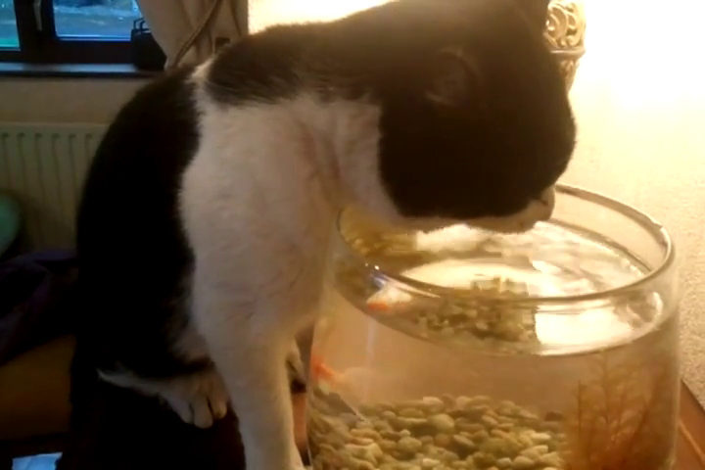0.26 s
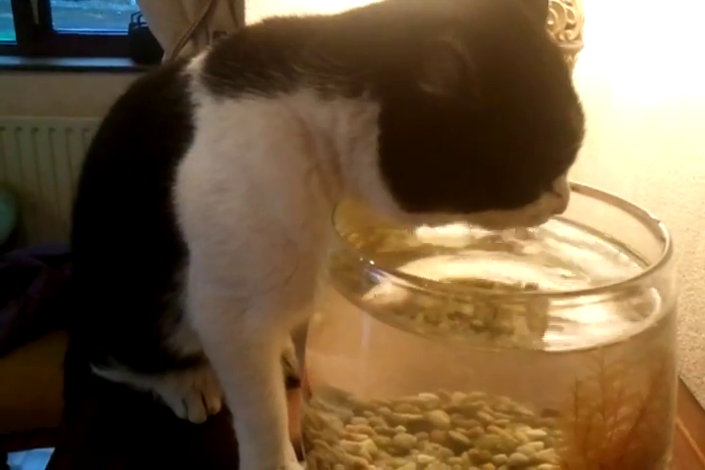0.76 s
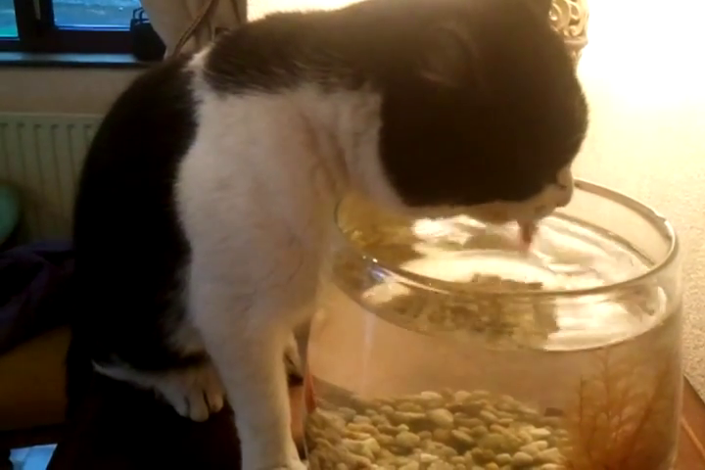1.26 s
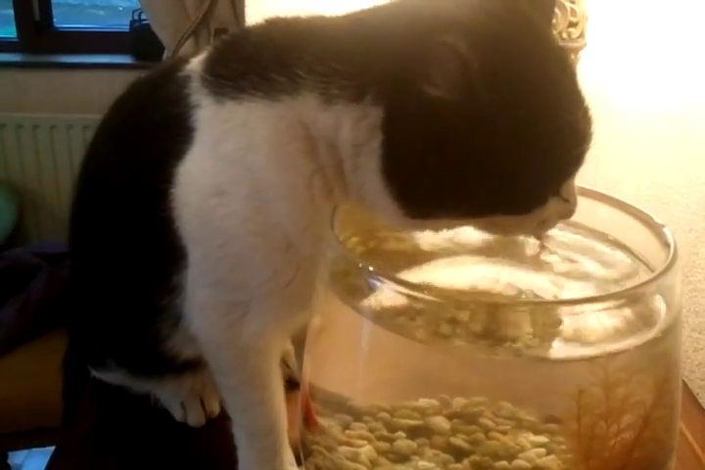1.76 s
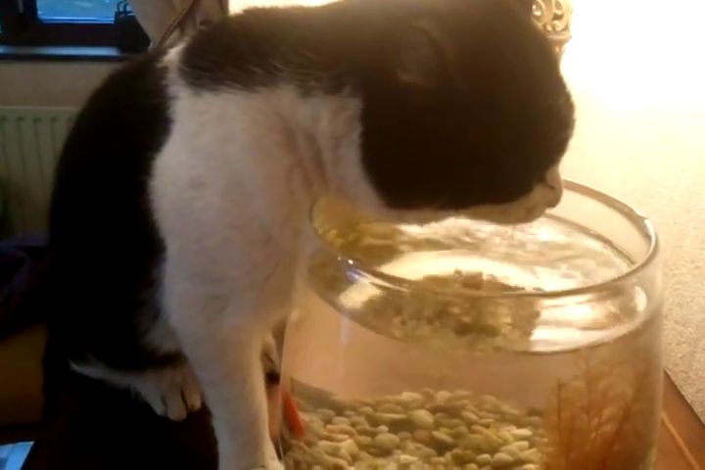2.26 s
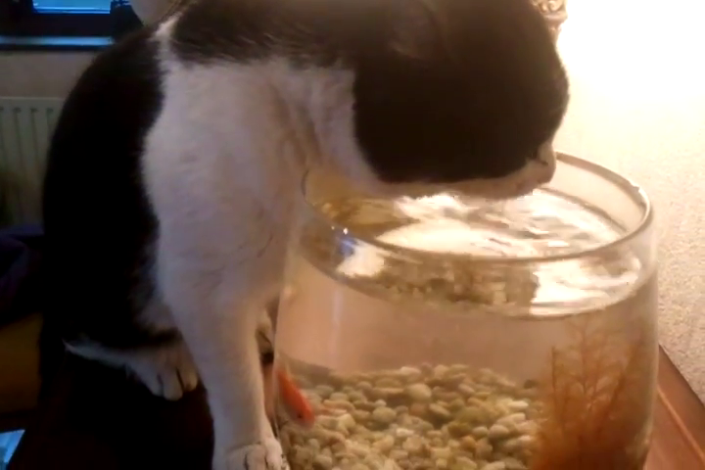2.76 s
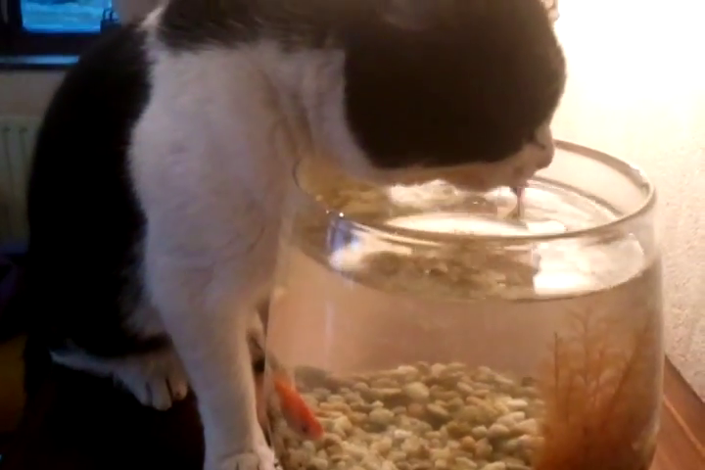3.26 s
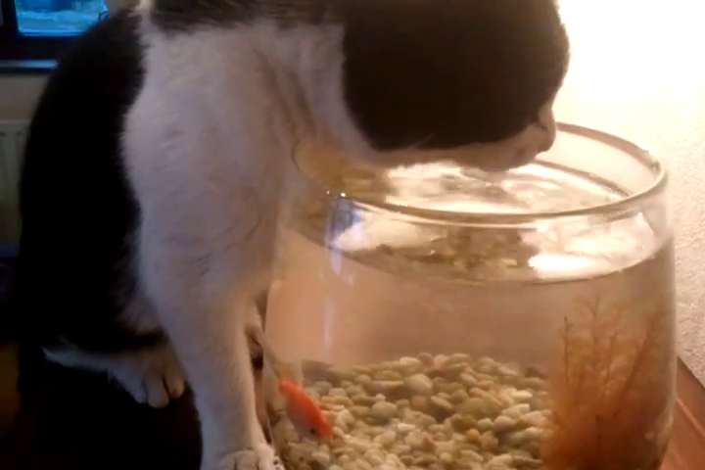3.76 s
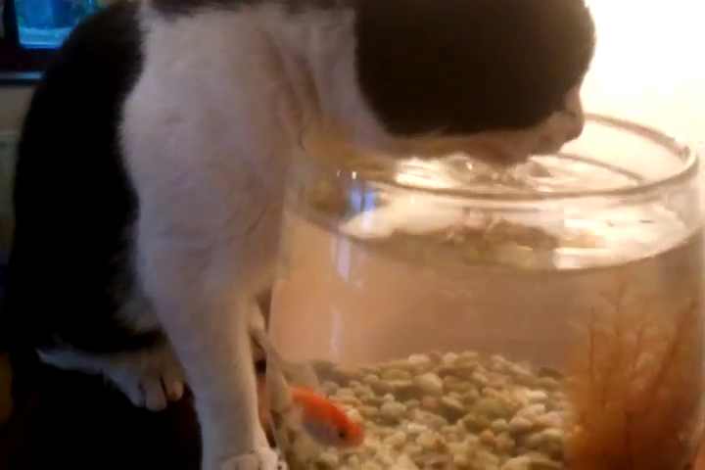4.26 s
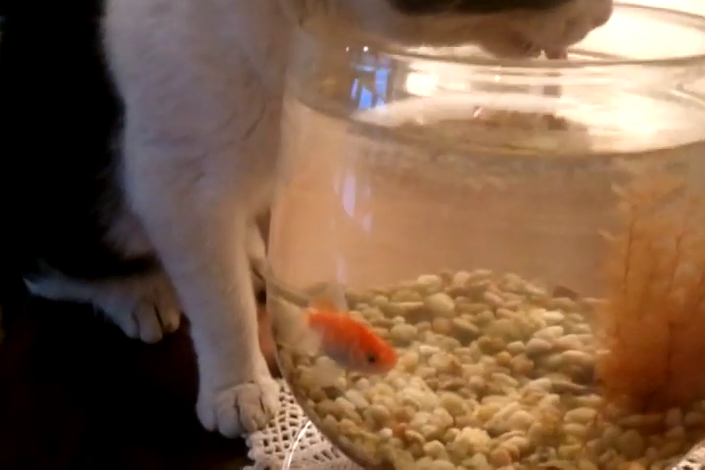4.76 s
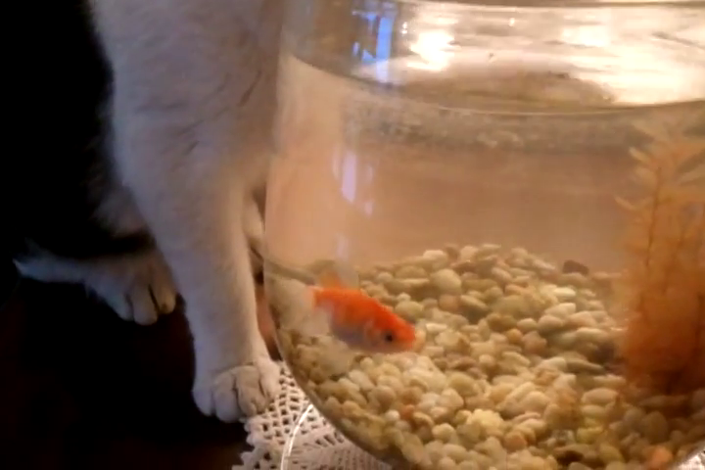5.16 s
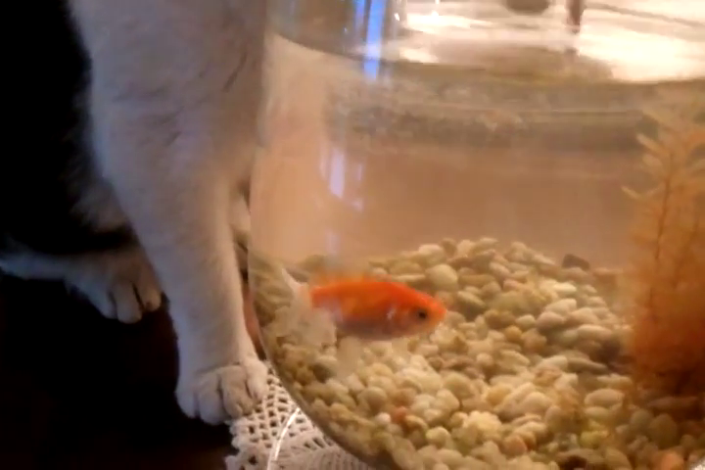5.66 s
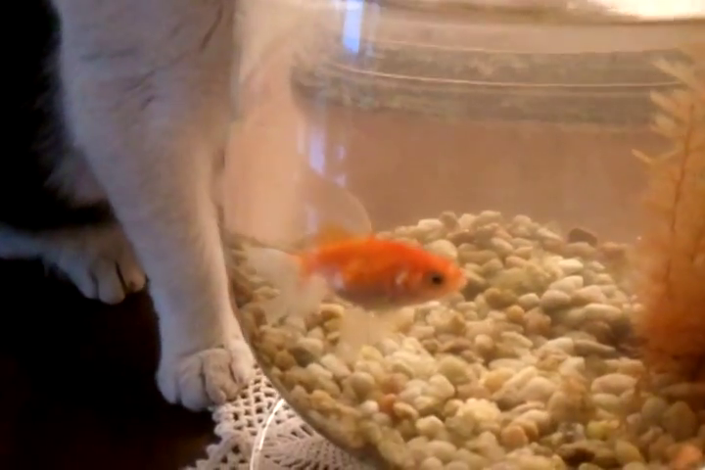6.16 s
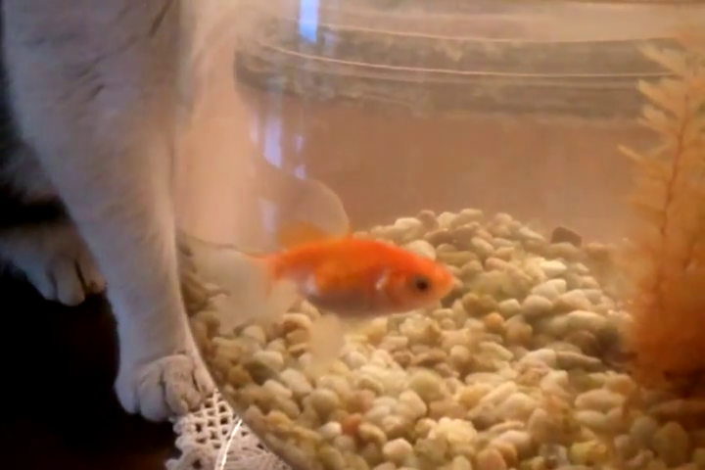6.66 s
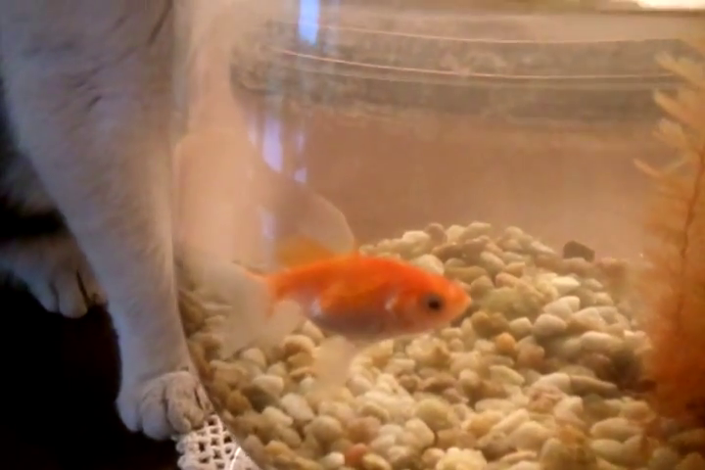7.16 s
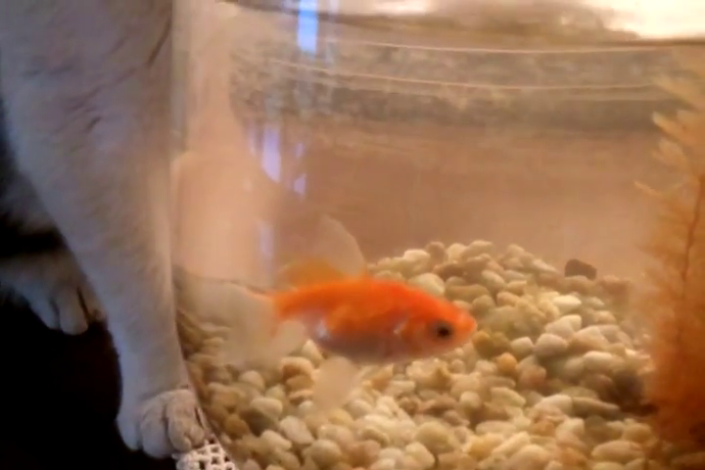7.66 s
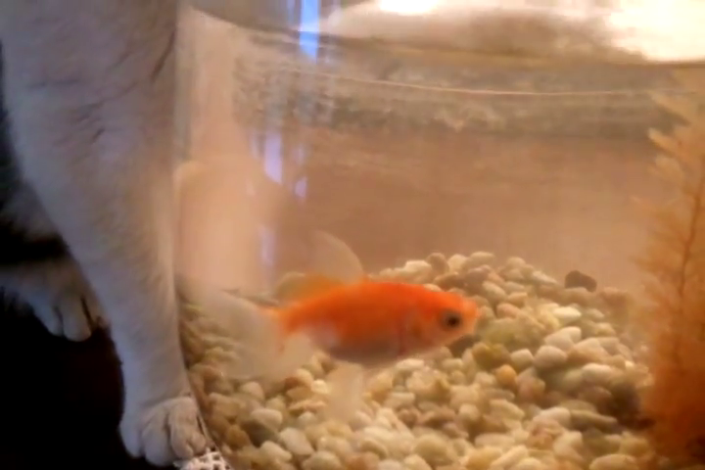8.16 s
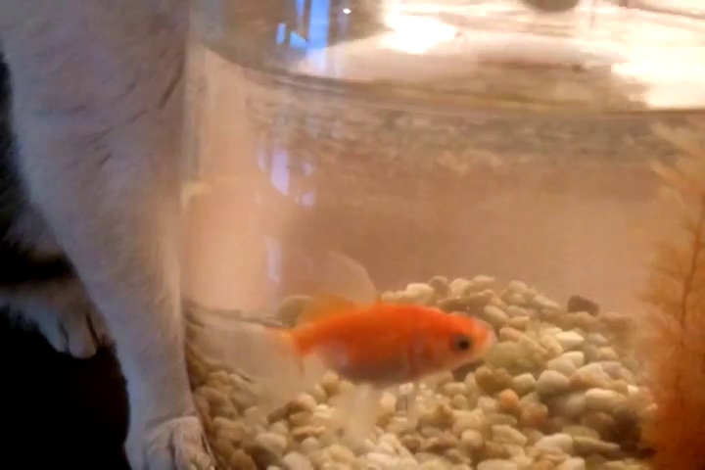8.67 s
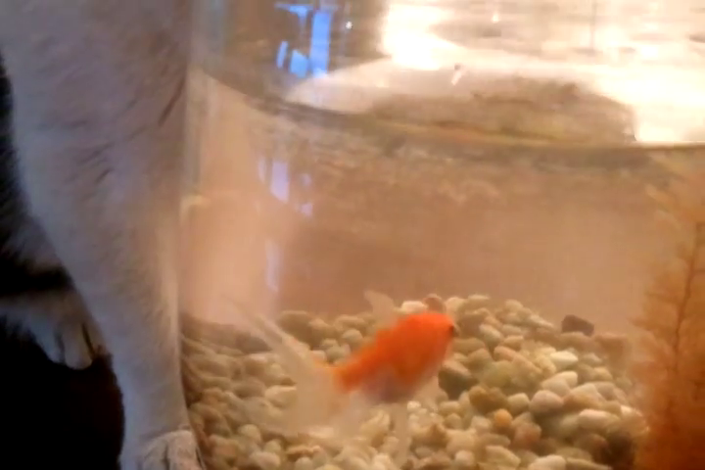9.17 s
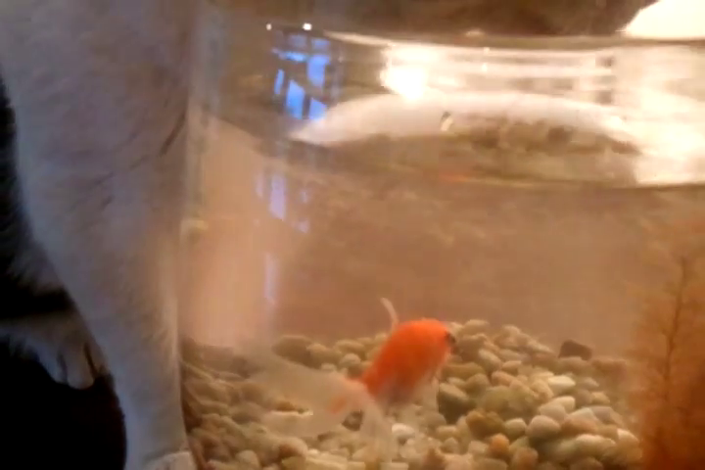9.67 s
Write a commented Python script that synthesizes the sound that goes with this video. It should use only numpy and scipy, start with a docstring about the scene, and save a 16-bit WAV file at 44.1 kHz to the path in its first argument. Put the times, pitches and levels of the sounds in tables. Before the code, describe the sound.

After a faint bump and rustle, a cat drinks steadily from a bowl of water, heard close up in a quiet room. Each lap is a little plop followed by tiny mouth smacks and wet ticks, with the odd drip falling back. Near the end a hard click and a louder, briefly ringing clack, like a latch closing, stand out over the continuing lapping.

```python
"""A faint bump and rustle, then a cat laps water from a glass bowl, about 3.5 times a second.
Each lap is a hollow plop, the damped resonance of an air cavity opened by the tongue; smacks and
wet ticks follow as the mouth closes, and drips fall from the chin. Soft bumps sound nearby in the
quiet room. Late on, something hard, perhaps a latch, clicks and then clacks shut, its modes ringing."""
import sys
import numpy as np
from scipy import signal
from scipy.fft import rfft, irfft, next_fast_len
from scipy.io import wavfile

SR = 44100
rng = np.random.default_rng(int(sys.argv[2]) if len(sys.argv) > 2 else 0)


def generate_wav(sig):
    """Save sig (samples, or channels by samples) to the path in sys.argv[1] as 16-bit PCM at SR."""
    pcm = np.round(np.clip(np.atleast_2d(sig).T, -1, 1) * 32767).astype(np.int16)
    wavfile.write(sys.argv[1], SR, pcm)


N = 437913

# The tongue pulls free of the water.
# Each row: time in seconds, level in dB, cavity pitch in Hz, relative splash level in dB.
LAPS = [(0.329, -44.5, 870, 5), (0.610, -43, 1310, 5.5), (0.872, -36.5, 1160, 2),
        (1.124, -33.5, 1090, -5.5), (1.452, -42.5, 1040, 0.5), (1.711, -44, 1170, 6), (1.962, -33, 940, -9),
        (2.286, -46, 1140, 3.5), (2.564, -41, 940, -1), (2.832, -39.5, 940, 0.5), (3.171, -50, 810, 12.5),
        (3.452, -38.5, 1080, -5), (3.731, -43, 940, 5), (4.072, -54, 1110, -11), (4.368, -41, 1120, -12),
        (4.641, -34, 1130, -17), (4.977, -38, 1070, -15), (5.262, -36.5, 1140, -7), (5.527, -32, 1070, -22),
        (5.884, -36, 1030, -9), (6.173, -37.5, 1070, -4), (6.449, -31.5, 1084, -9), (6.807, -42, 1070, -7),
        (7.115, -45.5, 1020, -17), (7.405, -38.5, 1060, -21), (7.701, -40, 1000, -3),
        (8.061, -33, 1130, -11), (8.350, -35, 980, -11), (8.624, -35, 1015, -6.5),
        (8.893, -31.5, 1010, -8.5), (9.241, -35, 1010, -9), (9.535, -34.5, 1040, -16),
        (9.818, -32, 1130, -10.5)]


def laps():
    """Cavity resonance: the tongue opens a pocket of air that plops, with a splash and a soft squelch."""
    out, t = np.zeros(N), np.arange(-SR // 25, SR // 12) / SR
    for s, db, hz, splash_db in LAPS:
        # the cavity sounds weakly as it opens, however hard it then breaks
        lead_s = .009 * rng.uniform(0.692, 1)
        opening = amp(-45.5) * pop(t + lead_s, hz, cycles=2.3, rise=0.013)
        plop = amp(0.5) * pop(t, hz, cycles=1.57, rise=0.013)
        slosh = spray(t - .003, centre_hz=1110, spread=.2, scatter_s=0.0071, cycles=2.0, count=5)
        splash = spray(t - .001, centre_hz=2720, spread=0.27, scatter_s=0.0041, cycles=1.64, count=8)
        lap = opening + amp(db) * (plop + amp(-12) * slosh + amp(splash_db + 2.5) * splash)
        add(out, s + t[0], lap)
        add(out, s + t[0], amp(-16) * room(lap, build_s=0.0022))
        add(out, s + t[0], amp(-29.5 + 0.66 * db) * squelch(t, lead_s=0.0022, linger_s=0.028, count=140))
    return out


def squelch(t, lead_s, linger_s, count):
    """Shot noise: water creeps over the tongue before a lap and crackles off it afterwards."""
    # The crackle's spectrum. Each row: frequency in Hz, gain in dB.
    wet_spectrum = [(300, -31), (700, -6), (1050, 10.5), (1600, 5), (2600, 0), (4300, -7.5), (6000, -1.5),
                    (9000, -26.5)]
    grains = np.zeros(len(t))
    grains[rng.integers(0, len(t), count)] = rng.standard_normal(count)
    crackle = unit(filtered(grains, lambda hz: amp(along(wet_spectrum, hz))))
    return crackle * np.exp(np.minimum(t / lead_s, -t / linger_s))


def tongue():
    """Bubble resonance: the tongue crackles sliding out; the torn water column fizzes and falls back."""
    out, t = np.zeros(N), np.arange(SR // 16) / SR
    reach_lead_s = .087
    for s, *_ in LAPS:
        reach = spray(t, centre_hz=3600, spread=.42, scatter_s=0.0052, cycles=3.2, count=14)
        add(out, s - reach_lead_s, amp(-46.5) * reach)
    for s, db in each_lap(delay_s=0.015, db=-49):
        fizz = spray(t, centre_hz=5240, spread=0.27, scatter_s=0.0041, cycles=1.2, count=10)
        add(out, s, amp(db) * fizz)
    for s, db in each_lap(delay_s=.019, db=-50.5):
        fall = spray(t, centre_hz=1440, spread=0.26, scatter_s=.008, cycles=1.56, count=5)
        add(out, s, amp(db) * fall)
    return out


def smacks():
    """A smaller cavity resonates higher: the closing mouth rings about an octave above the plop, and a few
    bright bursts ring out with the splash of a lap itself."""
    # The louder smacks, together with a few bright bursts of splash that land right on a lap (at 0.619, 1.723
    # and 2.576 s). Each row: start in seconds, level in dB, cavity pitch in Hz.
    loud = [(0.4237, -40, 2030), (0.4353, -42, 2050), (0.6188, -37, 3650), (0.7, -46, 2220),
            (1.1909, -46, 2990), (1.2423, -33, 2040), (1.2855, -46, 2490), (1.562, -44.5, 2340),
            (1.723, -47, 2880), (1.814, -43.5, 2090), (1.8284, -42.5, 3390), (2.0743, -31.5, 2030),
            (2.576, -41, 2650), (2.6614, -45, 2170), (2.747, -45.5, 2320), (2.7915, -43.5, 1780),
            (2.9504, -28.5, 2060), (3.5588, -46, 2040), (3.5716, -39.5, 2220), (3.8085, -46.5, 3000),
            (4.2064, -40, 2090), (4.4554, -43, 2040), (4.486, -41.5, 2080), (4.755, -35, 2050),
            (5.3786, -46, 2330), (6.1992, -38.5, 2180), (6.5872, -39, 2130), (7.151, -45, 2000),
            (7.5335, -42.5, 2360), (7.879, -41, 2280), (8.2095, -44.5, 2350), (9.3841, -41.5, 2800),
            (9.645, -42.5, 2180), (9.9046, -36, 2140)]
    out, t = np.zeros(N), np.arange(SR // 20) / SR
    loud_s = np.array(loud)[:, 0]
    # a faint smack follows each lap unless a loud one takes its place
    faint = [(s, db, 2220 * np.exp(0.1 * rng.standard_normal()))
             for s, db in each_lap(delay_s=.114, db=-52.5) if np.abs(loud_s - s).min() > .035]
    for s, db, hz in loud + faint:
        note = amp(db) * pop(t, hz, cycles=4.5, rise=0)
        lips = spray(t, centre_hz=2660, spread=0.28, scatter_s=0.0034, cycles=1.46, count=6)
        splash = spray(t, centre_hz=5620, spread=0.22, scatter_s=0.0059, cycles=1.34, count=6)
        smack = note + amp(db / 2) * (amp(-20.5) * lips + amp(-26.5) * splash)
        add(out, s, smack)
        add(out, s, amp(-14) * room(smack, build_s=.002))
    return out


def ticks():
    """Film rupture: saliva snaps with a high tick and a short fizz."""
    # The louder snaps. Each row: start in seconds, level in dB.
    snaps = [(0.5043, -40.5), (0.5508, -33.5), (0.621, -40.5), (0.82, -36), (1.3632, -43), (1.3982, -39),
             (1.5095, -36.5), (1.87, -45), (2.29, -38.5), (2.486, -47), (2.576, -44), (2.8452, -38.5),
             (3.175, -30), (3.237, -39.5), (4.2066, -47), (4.47, -44), (4.554, -46.5), (4.7367, -40.5),
             (4.741, -35.5), (5.8993, -44), (6.471, -44), (6.4832, -41), (7.709, -37), (9.152, -47.5),
             (9.2474, -41), (9.3123, -42), (9.555, -41.5), (9.828, -42)]
    out, t = np.zeros(N), np.arange(SR // 20) / SR
    for s, db in snaps:
        hz = 5750 * np.exp(0.054 * rng.standard_normal())
        note = amp(1.5) * pop(t, hz, cycles=4.5, rise=0.02)
        rupture = amp(-13) * rng.standard_normal(len(t)) * fade(t, 0.01)
        rupture = np.diff(rupture, prepend=0)  # a tiny source radiates mostly treble
        fizz = amp(-9.5) * spray(t, centre_hz=5880, spread=0.3, scatter_s=0.0055, cycles=4.3, count=8)
        tick = amp(db) * (note + rupture + fizz)
        add(out, s, tick)
        add(out, s, amp(-14) * room(tick, build_s=0.0018))
    return out


def drips():
    """Drop impact: a drip opens a small resonant hollow in the surface and throws a little spray."""
    # Drips from the chin into the bowl. Each row: start in seconds, level in dB.
    impacts = [(1.201, -41), (5.546, -41), (5.623, -40), (6.198, -35), (6.533, -37), (6.886, -42.5),
               (8.658, -35.5), (8.971, -41.5), (9.312, -43)]
    out, t = np.zeros(N), np.arange(SR // 20) / SR
    for s, db in impacts:
        hollow_hz = 1075 * np.exp(.06 * rng.standard_normal())
        note = pop(t, hollow_hz, cycles=1.4, rise=.013)
        splash = amp(-7.5) * spray(t, centre_hz=2800, spread=0.27, scatter_s=.004, cycles=1.9, count=5)
        drip = amp(db) * (note + splash)
        add(out, s, drip)
        add(out, s, amp(-19) * room(drip, build_s=.002))
    return out


def droplets(count=130):
    """A random point process: faint wet ticks of the mouth fall independently of the laps."""
    out, t = np.zeros(N), np.arange(SR // 25) / SR
    for when, size, pitch in rng.random((count, 3)):
        drop = spray(t, centre_hz=2300 * 2.7 ** pitch, spread=0.17, scatter_s=0.0067, cycles=3, count=6)
        add(out, when * N / SR, amp(-48.5 + 2 * size) * drop)
    return out


def latch():
    """Modal ringing: each of a quick run of hard contacts cracks and excites the latch's resonances."""
    # Each row: start in seconds, level in dB, relative levels of heavy body and light pawl in dB.
    contacts = [(7.440, -22, 6, -12), (7.4592, -10, -17, 11.5), (7.468, -10, -14, -19), (7.98, -5, 12, 2),
                (7.9827, 1, 5, -14), (7.987, -0.5, 1.5, -14), (7.992, -3, 5, 9.5), (7.9957, -8, -9, 4),
                (8.0012, -14.5, -10, -8)]
    # Each row: frequency in Hz, level in dB, time to fall 60 dB in seconds.
    modes = [(340, -17, .2), (433, -8, .2), (687, -8, .12), (759, -1, .1), (826, -9, .08), (1260, -8, .08),
             (1600, 1, .08), (1758, -5, .12), (1940, -9, .25), (2610, -6, .08), (2985, -3, .1),
             (3400, -3, .08), (3600, -3, .1), (3830, 0, .1), (4120, -1, .1), (4950, 0, .08), (5222, -2, .1),
             (6100, -4, .1)]
    # Each row: frequency in Hz, gain in dB.
    crack_spectrum = [(40, -52), (150, -29), (420, -2), (550, -37), (750, -5), (1050, -4.5), (1600, -6),
                      (2300, -4), (3700, -1), (5100, 1.5), (6400, -2), (8000, -18.5), (10000, -18)]
    out, t = np.zeros(N), np.arange(SR // 3) / SR
    hz, level, t60 = np.transpose(modes)[:, :, None]
    for s, db, body_db, pawl_db in contacts:
        strength = amp(level + 2.1 * rng.standard_normal(hz.shape)) * (1 - np.exp(-t * hz))
        phase = 2 * np.pi * rng.random(hz.shape)
        ring = np.sum(strength * fade(t, t60) * np.sin(2 * np.pi * hz * t + phase), axis=0)
        rattle = rng.standard_normal(len(t)) * (fade(t, 0.017) + amp(-12.5) * fade(t, 0.11))
        crack = filtered(rattle, lambda f: amp(along(crack_spectrum, f)))
        blow = amp(db - 24.5) * (amp(8.5) * crack + amp(-16.5) * ring)
        # a light touch hardly moves the heavy, low-pitched body
        body = signal.lfilter(*signal.butter(1, 1800, fs=SR), blow)
        blow = blow + (amp(body_db) - 1) * body
        add(out, s, blow)
        add(out, s, amp(db + pawl_db - 23.5) * pop(t, hz=3760, cycles=3.3, rise=0))
        add(out, s, amp(-3) * room(blow, build_s=0.0026))
    # so small a part radiates little bass
    return signal.lfilter(*signal.butter(2, 200, "highpass", fs=SR), out)


def bumps():
    """Cushioned impact: a padded contact excites mostly low frequencies, a dull knock and brief rumble."""
    # Each row: start in seconds, level in dB, decay time in seconds, pitch in Hz, relative rumble in dB.
    knocks = [(0.0, -50.5, 0.051, 220, -18), (0.501, -41, 0.043, 268, -34), (5.228, -48.5, 0.054, 200, -24),
              (5.605, -54, 0.03, 161, -20), (5.775, -56.5, 0.17, 182, -18), (6.002, -43.5, 0.059, 316, -12),
              (6.318, -52.5, 0.068, 320, -18), (6.722, -47.5, 0.072, 272, -30),
              (7.054, -52, 0.075, 224, -18), (7.445, -43, 0.025, 330, -26)]
    # Each row: frequency as a multiple of the pitch, spectral density in dB.
    thud_spectrum = [(.12, -33), (.4, -23.5), (.7, 1), (1, -2), (1.7, -5.5), (3, -15.5), (8, -20),
                     (24, -47), (40, -72)]
    rumble_spectrum = [(25, -27), (70, 17), (110, 7), (250, -36), (1000, -82)]  # Hz, dB
    out, t = np.zeros(N), np.arange(SR // 2) / SR
    for s, db, decay_s, hz, rumble_db in knocks:
        knock = noise([(multiple * hz, level) for multiple, level in thud_spectrum], len(t))
        rumble = amp(rumble_db) * noise(rumble_spectrum, len(t))
        envelope = (1 - np.exp(-t / 0.004)) * np.exp(-t / decay_s)
        add(out, s, amp(db) * envelope * (knock + rumble))
    return out


def room(x, build_s):
    """Reverberation: x excites a diffuse tail of unit energy that builds up and dies away."""
    # Each row: frequency in Hz, time to fall 60 dB in seconds.
    reverb_times = [(150, 0.3), (500, 0.31), (1500, 0.4), (4000, 0.29), (9000, .25)]
    hz, t, spectra = signal.stft(rng.standard_normal(SR // 2), SR, nperseg=256)
    decay = fade(t, along(reverb_times, hz)[:, None])
    tail = signal.istft(spectra * decay * (1 - np.exp(-t / build_s)), SR)[1]
    return signal.fftconvolve(x, tail / np.linalg.norm(tail))


def hiss():
    """Broadband noise: room and microphone hiss steadily, while a few soft rustles swell and fade."""
    # Each row of both spectra: frequency in Hz, spectral density in dB.
    hiss_spectrum = [(15, -48.5), (25, -34), (38, -17.5), (110, -3.5), (150, 1), (180, 0.5), (235, 2.5),
                     (1120, -1.5), (1670, -5), (2320, -5), (2980, -7.5), (6040, -9.5), (6850, -14.5),
                     (7960, -35), (9030, -31), (10200, -46), (13300, -88), (22000, -120)]
    rustle_spectrum = [(40, -25), (200, -4), (1000, -3), (3000, -2.5), (6000, -7), (8000, -25),
                       (10200, -44)]
    # Each row: time of the crest in seconds, half length in seconds, level in dB.
    rustles = [(0.078, 0.11, -58.5), (4.495, 0.17, -58), (5.503, 0.42, -59.5), (6.676, 0.19, -55)]
    t = np.arange(N) / SR
    swell = sum(amp(db) * np.exp(-((t - s) / half) ** 2) for s, half, db in rustles)
    return amp(-55.5) * noise(hiss_spectrum, N) + swell * noise(rustle_spectrum, N)


def pop(t, hz, cycles, rise):
    """Damped oscillation: an air cavity rings for a few cycles, rising in pitch if it shrinks; peak 1."""
    age = np.maximum(t, 0) * hz / cycles
    phase = 2 * np.pi * cycles * (age + rise * (age - 2 * (1 - np.exp(-age))))
    ring = (1 - np.exp(-2 * age)) ** 2 * np.exp(-age) * np.sin(phase)
    return ring / (np.abs(ring).max() + 1e-9)


def spray(t, centre_hz, spread, scatter_s, cycles, count):
    """Superposed pops: tiny bubbles burst, the later ones tending to be weaker and higher; peak 1."""
    delay = rng.exponential(scatter_s, count) * (np.arange(count) > 0)
    lateness = delay / (delay + scatter_s)
    pitch = centre_hz * np.exp(spread * rng.standard_normal(count) + 0.29 * (lateness - .5))
    size = rng.uniform(0.27, 1, count) * (1 - 0.33 * lateness)
    burst = sum(g * pop(t - d, min(hz, 8000), cycles, 0) for d, hz, g in zip(delay, pitch, size))
    return burst / (np.abs(burst).max() + 1e-9)


def each_lap(delay_s, db, delay_share=.18, scatter_db=3):
    """Jitter: an event follows every lap, never quite alike. Each row: start in seconds, level in dB."""
    chance = rng.uniform(-1, 1, (len(LAPS), 2))
    times = np.array(LAPS)[:, 0] + delay_s * (1 + delay_share * chance[:, 0])
    return np.column_stack([times, db + scatter_db * chance[:, 1]])


def amp(db):
    """Decibels to amplitude ratio."""
    return 10 ** (np.asarray(db) / 20)


def unit(x):
    """Normalisation to rms 1."""
    return x / np.sqrt(np.mean(x ** 2) + 1e-20)


def along(points, hz):
    """Interpolation of (Hz, value) points on a logarithmic frequency axis."""
    f, v = np.transpose(points)
    return np.interp(np.log(hz + 1), np.log(f + 1), v)


def filtered(x, response):
    """Linear filtering: the spectrum of x times a frequency response."""
    size = next_fast_len(len(x) + SR // 10)
    return irfft(rfft(x, size) * response(np.fft.rfftfreq(size, 1 / SR)), size)[:len(x)]


def noise(spectrum, size):
    """Spectral shaping: coloured noise of rms 1."""
    return unit(filtered(rng.standard_normal(size), lambda hz: amp(along(spectrum, hz))))


def fade(t, t60):
    """Exponential decay, 60 dB in t60 seconds."""
    return np.exp(-np.log(1000) * t / t60)


def add(track, s, sound):
    """Superposition: a sound joins the track at s seconds."""
    start = int(np.clip(round(s * SR), 0, N))
    track[start:start + len(sound)] += sound[:N - start]


def scene():
    """The sources sum at a microphone near the cat; its treble roll-off dulls ticks and cracks."""
    # Each row: frequency in Hz, gain in dB.
    microphone_response = [(6500, 0), (7300, 2), (8000, -11.5), (8700, -2), (9300, -7.5), (10000, -17.5)]
    sharp = laps() + tongue() + drips() + smacks() + ticks() + droplets() + latch()
    heard = filtered(sharp, lambda hz: amp(along(microphone_response, hz)))
    return (heard + bumps() + hiss())[None]


def record(dry):
    """Band limiting: an ideal low-pass filter removes the highest treble."""
    top_hz = 10200
    return np.array([filtered(channel, lambda hz: hz < top_hz) for channel in dry])


dry = scene()
out = record(dry)
generate_wav(out)
```